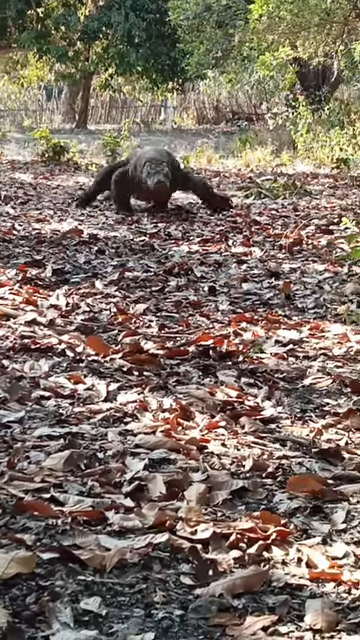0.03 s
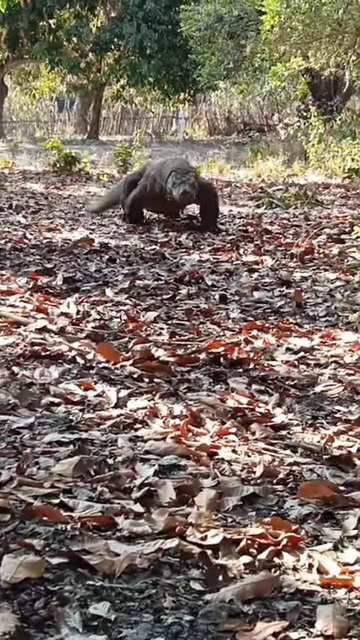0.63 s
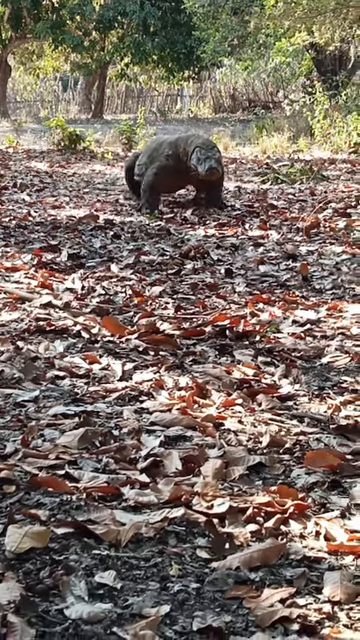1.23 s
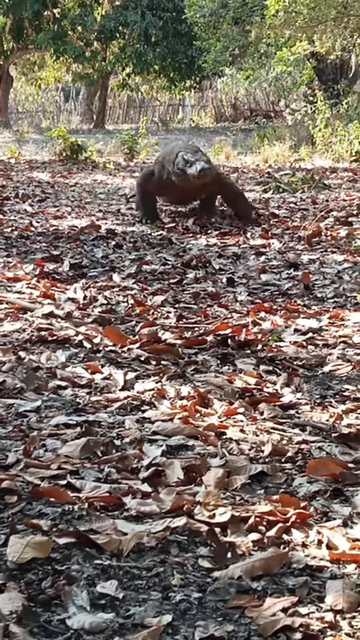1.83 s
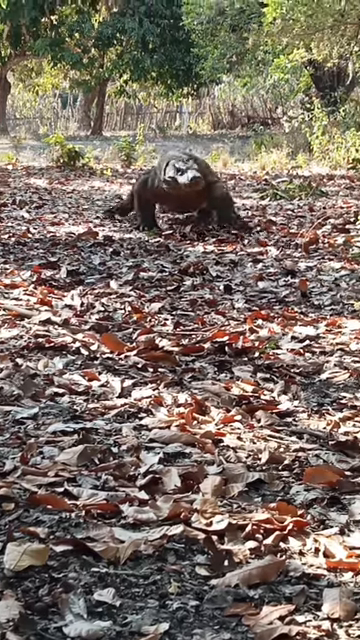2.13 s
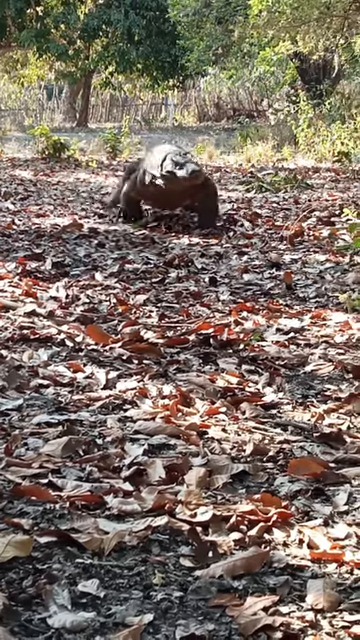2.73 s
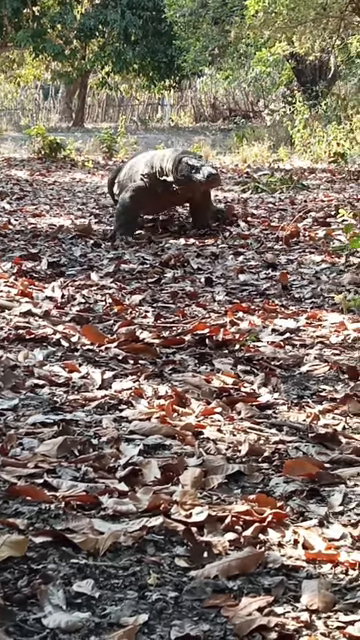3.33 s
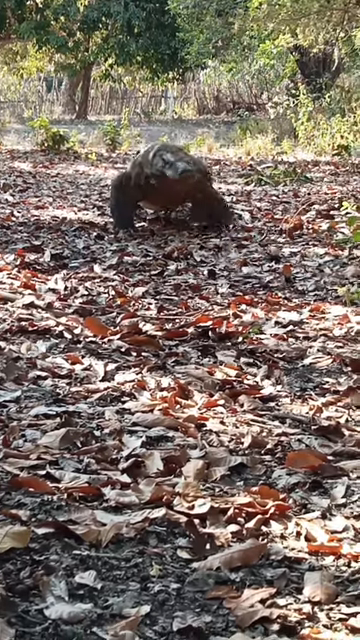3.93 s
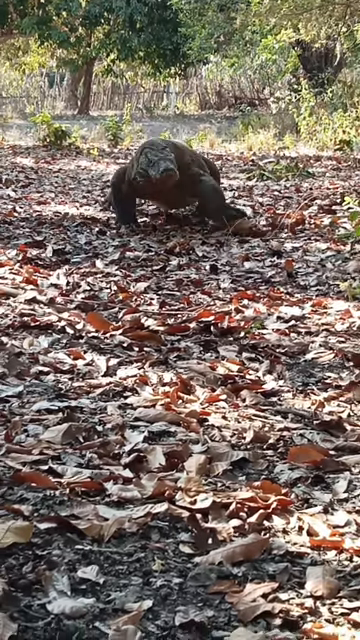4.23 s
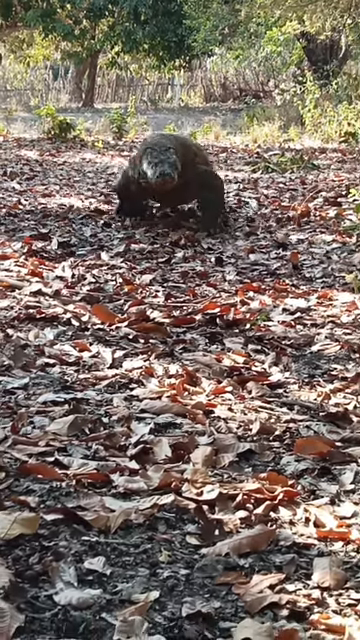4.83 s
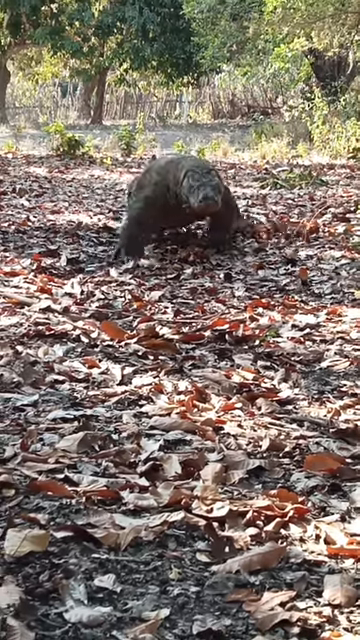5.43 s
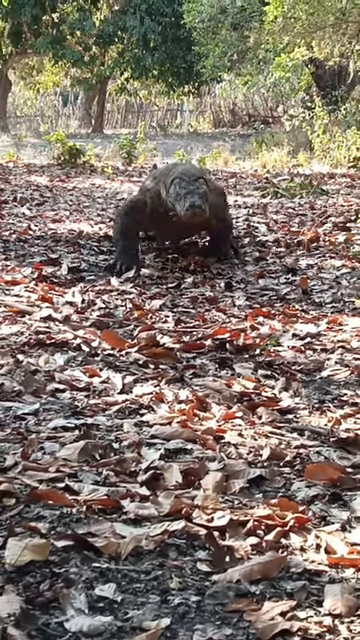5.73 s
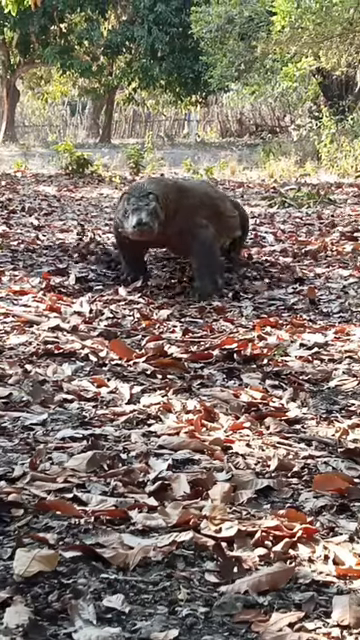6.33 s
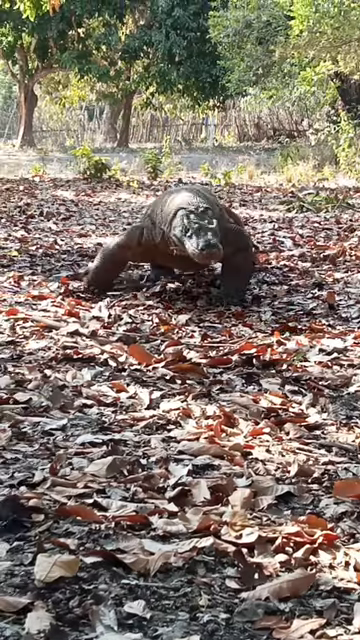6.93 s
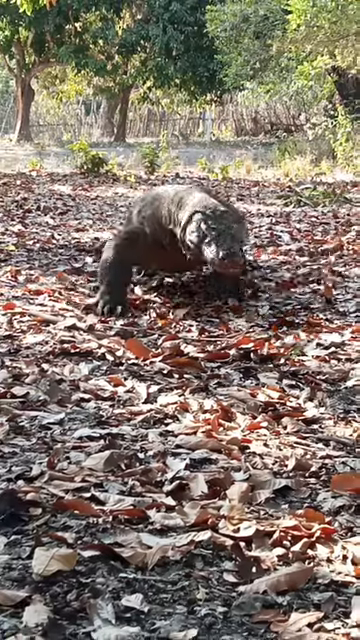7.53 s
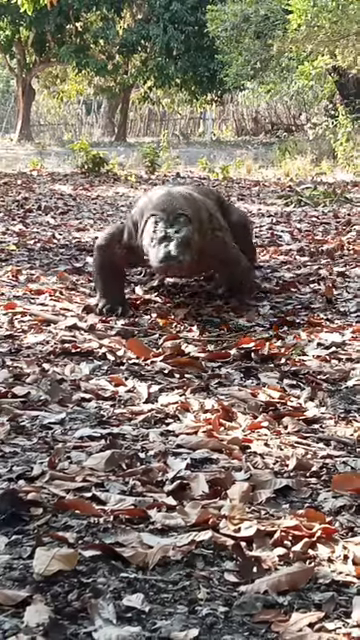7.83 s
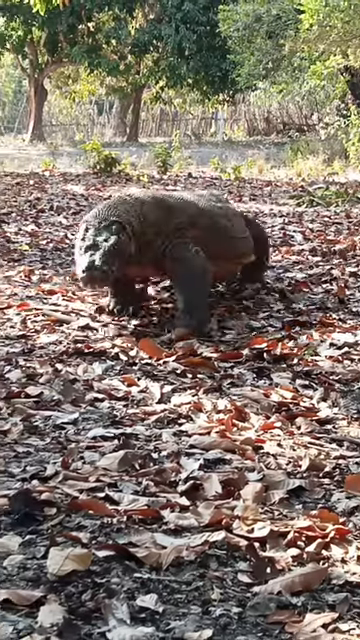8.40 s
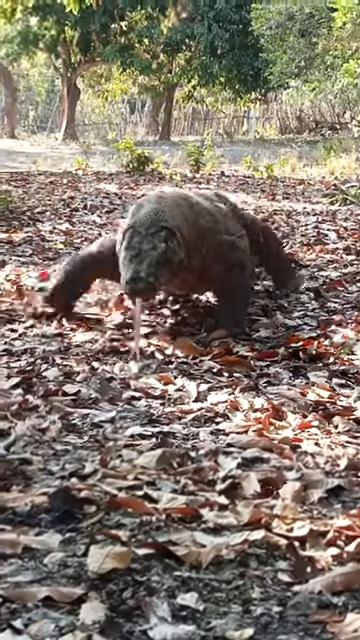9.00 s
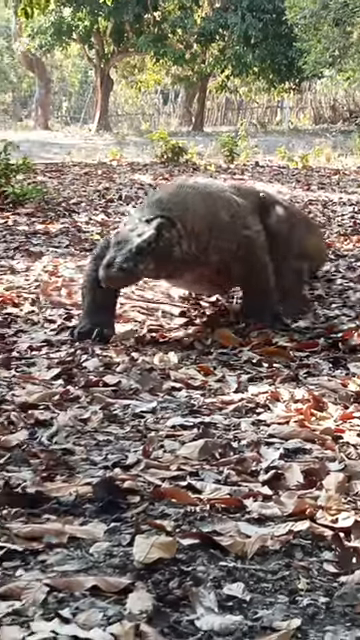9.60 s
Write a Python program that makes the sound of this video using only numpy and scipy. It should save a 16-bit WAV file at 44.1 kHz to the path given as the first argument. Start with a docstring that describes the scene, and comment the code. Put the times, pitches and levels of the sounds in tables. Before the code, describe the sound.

A heavy lizard walks through dry leaf litter outdoors toward a low microphone. Each stride crushes and drags leaves in a crackling swell, a little more than once a second, with lighter scuffs between. Twigs snap, leaf edges tick and soft thuds sound over a low rumble and faint air. Near the end there is a brief dull handling rub, and the crunching becomes closer and crisper.

```python
"""Crunching, rustling strides in dry leaf litter: a heavy lizard walks towards a low phone, outdoors.
Each stride crushes and drags leaves in a swell of tiny fractures, with lighter scuffs between.
Twigs snap, leaf edges tick, and soft thuds sound over a low rumble and faint air.
Near the end the animal is close and the phone turns, with a dull rub and a shift of treble colour. Mono."""
import sys
import numpy as np
from scipy import signal
from scipy.fft import rfft, irfft, next_fast_len
from scipy.io import wavfile
from scipy.ndimage import uniform_filter1d

SR = 44100
rng = np.random.default_rng(int(sys.argv[2]) if len(sys.argv) > 2 else 0)


def master(y):
    """Save y as 16-bit WAV."""
    cut = np.clip(np.atleast_2d(y).T, -1, 1)
    pcm = np.round(cut * 32767)  # scale
    wavfile.write(sys.argv[1], SR, pcm.astype(np.int16))


N = 426006
T = np.arange(N) / SR

# A foot presses and drags. Each row: full weight at seconds, level in dB, rise, hold and fall in seconds,
# then crisp treble, papery rasp, hollow body, fine sizzle and 3 kHz notch as tone offsets in dB.
STRIDES = [(0.365, -23.5, 0.28, 0.099, 0.42, -9.5, -5.5, -16, -17, -1),
           (1.094, -23, 0.11, 0.093, 0.17, -10.5, -4.5, -15.5, -17.5, -4),
           (1.73, -21, .126, 0.067, .25, -7, -4.5, -17.5, -21, -2.5),
           (2.475, -24.5, .19, 0.074, .23, -12.5, -2.5, -15, -17, -1),
           (3.11, -23, .075, 0.091, 0.24, -5.5, -2.5, -13.5, -19, -3),
           (3.838, -32, .28, 0.074, 0.28, -14, -5.1, -16.5, -18, -0.5),
           (4.641, -25.5, .2, 0.079, 0.49, -10, -6, -15.5, -18, 0.5),
           (5.441, -25, 0.061, 0.14, 0.14, -9.5, -5, -15, -21.5, -3),
           (6.259, -24, .21, .035, .33, -6.5, -3.5, -15.5, -18, -2),
           (6.8, -28, .07, .17, 0.29, -9.5, -4.5, -14, -18, 0.5),
           (7.696, -23, 0.27, 0.06, 0.44, -7.5, -3, -15.5, -18, -1),
           (8.56, -25.4, .05, .15, .4, -4, -1.6, -14, -20, -1),
           (9.438, -22.5, .06, .036, .075, -12.5, -4.5, -13.5, -15.5, -6)]
# Brittle leaves are spent and the foot sinks in: drift of those five offsets in dB per second.
DRIFT_DB_PER_S = (-22.5, -1, 2.5, 13, -10)
# A foot lifts or the tail sweeps. Each row: peak time in seconds, level in dB, rise and fall in seconds,
# crisp and rasp offsets in dB.
SCUFFS = [(.025, -27, .24, 0.092, -9.5, -7.5), (.188, -32, 0.31, 0.13, -12, -6.5),
          (.728, -28, 0.063, .07, -12, -6), (.82, -38.5, .14, 0.11, -30, 1),
          (1.38, -30.5, .16, 0.053, -5, -6.5), (1.541, -34.5, .11, 0.081, -6, -2),
          (1.935, -29, .15, 0.094, -14, -5.3), (2.092, -26, .11, 0.034, -12.5, -8.5),
          (2.738, -30.5, .12, 0.071, -9, -2), (2.965, -38, .17, 0.062, -4.5, -4),
          (3.375, -31.3, .14, .11, -10, -5), (3.58, -38, .11, .2, -17, -2),
          (4.116, -41, .13, 0.099, -6, -3.7), (4.216, -37, .18, 0.051, -10.5, -6.5),
          (4.501, -34, 0.21, .08, -13, -3.5), (5.003, -28, 0.087, .09, -13, -6.5),
          (5.255, -41, 0.26, 0.039, -6, -8), (5.797, -33.5, 0.19, 0.058, -9.5, -3),
          (5.874, -40, .07, .09, -7, -3.5), (6.133, -31.5, 0.29, 0.091, -6, -2),
          (6.537, -29.5, .11, 0.092, -9.5, -6.5), (6.65, -39.5, 0.16, 0.19, -11.5, -5),
          (7.19, -35.5, .12, .1, -9, 4.5), (7.291, -31, .1, 0.054, -12, -6),
          (7.947, -34, 0.25, 0.11, -46.5, -12), (8.186, -28, .15, .07, -20.5, -8.5),
          (8.98, -32, 0.29, 0.065, -10, -2), (9.1, -36, .08, 0.093, -12, -9),
          (9.608, -38.5, 0.086, 0.077, -7, -1)]
# Body, sizzle and notch offsets in dB, for scuffs and tail.
SCUFF_TONE_DB = (-15, -16, 0)
# Echoes off the ground and the animal's flank. Each row: mean delay in milliseconds, rms gain.
ECHOES = [(.3, .07), (.62, .09), (1.1, .12)]
# Twigs and stalks snap. Each row: start in seconds, relative level in dB, pitch in Hz.
SNAPS = [(.7396, -17.5, 1512), (1.0391, -16, 1950), (1.4038, -14, 1700), (1.423, -21, 1900),
         (2.0947, -14, 1480), (2.1088, -13, 1300), (2.5364, -12, 1199), (2.9156, -20, 1900),
         (2.9508, -19.5, 1110), (3.4956, -20, 1080), (4.2837, -24.5, 1370), (4.935, -13.5, 1310),
         (4.9659, -10.5, 1210), (5.0136, -13, 1250), (5.024, -11, 762), (5.052, .5, 1040),
         (5.1905, -26, 1320), (5.3267, -25, 1210), (5.8836, -24, 1490), (6.6813, -17.5, 1180),
         (8.2054, -19, 1300), (9.071, -21, 560), (9.08, -20, 1560), (9.1194, -17, 1500), (9.136, -18, 1130),
         (9.1789, -20, 1850), (9.5907, -19, 2130), (9.6307, -16, 2080)]
# Twig resonances. Each row: multiple of the pitch, relative level in dB, 60 dB decay in seconds.
TWIG_MODES = [(1, 16.5, 0.0037), (1.75, 6.5, 0.0034), (3.9, 0, 0.0065)]
# Leaf edges split. Each row: start in seconds, relative level in dB.
TICKS = [(.9534, -20), (1.3763, -17), (5.248, -18), (5.2767, -16), (7.1975, -19.5), (8.4224, -26),
         (9.0804, -9), (9.1022, -18), (9.1354, -21), (9.2154, -26), (9.3417, -22), (9.3605, -30),
         (9.5192, -13), (9.5904, -14.5), (9.6086, -16)]
# Soft thuds. Each row: centre in seconds, relative level in dB, pitch in Hz.
THUDS = [(.779, -35, 127.6), (0.856, -33, 104), (0.955, -39, 94), (1.116, -32, 110), (1.271, -38, 89),
         (1.89, -39.5, 106), (2.11, -32, 86.44), (2.315, -44, 80.8), (3.17, -46.5, 120.1), (3.784, -38, 89),
         (4.277, -42, 83.2), (5.053, -40, 75), (7.451, -33, 94.99), (7.548, -32, 99.5), (7.764, -29.5, 119),
         (8.37, -34, 93.05), (8.775, -30.5, 159.8), (8.863, -28, 92), (9.111, -36, 141)]
# Low rumble at the phone. Each row: centre in seconds, level in dB, half width in seconds.
RUMBLE_SWELLS = [(.08, -60, 0.087), (1.051, -54, .17), (2.12, -61, 0.25), (4.55, -53, .1),
                 (7.38, -45, 0.077), (7.76, -44.5, 0.16), (8.37, -48.5, 0.069), (8.87, -48, 0.063)]
# Spectra of far leaves, near leaves, ticks, rumble and air. Each row: frequency in Hz, gain in dB.
FAR_LEAF_COLOUR = [(100, -22.5), (250, -10.5), (600, -3), (950, 1.8), (1600, 0), (2500, -1), (3050, -6),
                   (3850, 3), (4450, 2), (5100, -7.5), (6100, -7), (7300, -12), (8600, -5.5),
                   (11300, -22.5), (15500, -27.5)]
NEAR_LEAF_COLOUR = [(100, -18), (250, -8.5), (600, 0), (1600, 2), (3100, 2), (4000, 3.5), (5500, -7),
                    (7700, -16), (9700, -4), (10700, -8.5), (11800, -19), (13500, -21), (15000, -21.5)]
TICK_COLOUR = [(500, -28), (2000, -5), (4200, 11), (7000, -14), (9500, 10.5), (12000, -13), (15000, -7)]
RUMBLE_COLOUR = [(25, -28), (50, -9), (78, 2.5), (115, -4), (180, -6.5), (500, -40)]
AIR_COLOUR = [(20, -54), (80, 6), (300, 6), (1000, -15), (4000, 7.5), (8000, -32), (15000, -15.5)]


def leaves(turn_start_s=8.765, turn_end_s=8.89):
    """Harder crushing breaks more leaves a second; each contact's tone weights the bands of the rustle."""
    crush_db, push_db, crisp_db, rasp_db, body_db, sizzle_db, notch_depth_db, swish_hz = gait()
    near = np.clip((T - turn_start_s) / (turn_end_s - turn_start_s), 0, 1)
    cracks_per_s = 5500 * undb(.75 * (crush_db + 28) - 7 * near)  # close by, single cracks stand out
    grains = reflect(crackle(cracks_per_s))
    rustle = swish(grains, swish_hz) * (1 - near) + colour(grains, NEAR_LEAF_COLOUR) * near
    # A dragged foot sounds hollow: rasp and body stand out, a notch opens between them.
    hollow_db = .5 * (rasp_db + 3.5) + .45 * (body_db + 13)
    knock_db = push_db - 5.5 + .35 * (body_db + 13.5) - .08 * (rasp_db + 5.5)
    crunch_db = -5.5 - hollow_db
    notch_db = notch_depth_db - 10.5 - .74 * hollow_db
    hiss_db = .36 * rasp_db + .38 * crisp_db + .32 * sizzle_db + 2.2 * near - .8
    bands = split(rustle, edges_hz=(600, 1400, 2750, 3350, 5000, 7500, 11300))
    bands_db = body_db + push_db - .6, knock_db, crunch_db, notch_db, rasp_db, hiss_db, crisp_db, sizzle_db
    rustle = sum(unit(part) * undb(db) for part, db in zip(bands, bands_db))
    return rustle * undb(crush_db + slips() - 1)


def gait(tail_db=-48, load_db=2, stride_hz=8610, glide_hz=417, glide_s=.15, scuff_hz=8770):
    """Tail, strides and scuffs add in power. Returns level, push-off, five tones (dB) and swish (Hz)."""
    t = T[::50]
    total_power = np.full(len(t), undb(tail_db) ** 2)
    tone_sum = np.outer([-10.5, -4, *SCUFF_TONE_DB, scuff_hz], total_power)  # tail: crisp, rasp first
    push_db = 0
    for at_s, db, rise_s, hold_s, fall_s, *tone_db in STRIDES:
        since_s = t - at_s
        load = np.clip(since_s / hold_s, 0, 1) - .5  # weight comes onto the foot
        power = swell(since_s, db, rise_s, hold_s, fall_s) * undb(load_db * load) ** 2
        drift_db = np.outer(DRIFT_DB_PER_S, np.clip(since_s, -.1, .23))
        tone_sum[:-1] += power * (np.array(tone_db)[:, None] + drift_db)
        tone_sum[-1] += power * (stride_hz + glide_hz * np.clip(since_s / glide_s, -1, 1))
        push_db += 1 / (1 + ((since_s - .27 * hold_s) / .058) ** 2)  # push-off deepens the crunch
        total_power += power
    for at_s, db, rise_s, fall_s, crisp_db, rasp_db in SCUFFS:
        power = swell(t - at_s, db, rise_s, hold_s=.02, fall_s=fall_s)
        tone_sum += np.outer([crisp_db, rasp_db, *SCUFF_TONE_DB, scuff_hz], power)
        total_power += power
    controls = 10 * np.log10(total_power), push_db, *(tone_sum / total_power)
    return [np.interp(T, t, control) for control in controls]


def swell(since_s, db, rise_s, hold_s, fall_s, shoulder_db=1.04):
    """Power of one contact: 20 dB up in rise_s, hold, 20 dB down in fall_s, with round shoulders."""
    away = np.maximum(-since_s / rise_s, (since_s - hold_s) / fall_s)
    drop_db = np.hypot(20 * np.clip(away, 0, 10), shoulder_db) - shoulder_db
    return undb(db - drop_db) ** 2


def crackle(rate_per_s, ring_db=1.5, flicker_db=2.5, scatter_db=-9, scatter_t60_s=.019):
    """Sharp cracks plus the ringing of leaves of many sizes, which come and go as the foot moves on."""
    cracks = fractures(rate_per_s, spread_db=2)
    edges_hz = np.linspace(np.sqrt(300), np.sqrt(16000), 27) ** 2
    rings = 0
    for lo_hz, hi_hz in zip(edges_hz, edges_hz[1:]):
        ring = band(fractures(rate_per_s / 3.5, spread_db=4), lo_hz, hi_hz)
        rings += ring * undb(flicker_db * wander(rate_hz=30))
    direct = unit(cracks + undb(ring_db) * unit(rings))
    # Each crack briefly shakes the neighbouring leaves.
    shaken_power = signal.lfilter([1], [1, -undb(-120 / (scatter_t60_s * SR))], direct ** 2)
    scatter = unit(np.sqrt(shaken_power) * rng.standard_normal(N))
    return unit(direct + undb(scatter_db) * scatter)


def fractures(rate_per_s, spread_db):
    """Random clicks of uneven size; power is independent of rate."""
    at = np.flatnonzero(rng.random(N) * SR < rate_per_s)
    sizes = undb(spread_db * np.clip(rng.standard_normal(len(at)), -3, 3))
    clicks = np.zeros(N)
    clicks[at] = sizes * rng.choice([-1, 1], len(at)) / np.sqrt(rate_per_s[at])
    return unit(clicks)


def swish(grains, centre_hz):
    """Feet move against the ground, so the treble humps of the leaf colour glide."""
    stops_hz = np.linspace(8100, 9600, 6)
    hz, db = np.transpose(FAR_LEAF_COLOUR)
    out = 0
    for stop_hz, share in zip(stops_hz, np.eye(len(stops_hz))):
        moved_hz = hz * (stop_hz / 8700) ** np.minimum(hz / 8000, 1.2)  # low resonances barely move
        crossfade = np.interp(centre_hz, stops_hz, share)
        out += colour(grains, np.column_stack([moved_hz, db])) * crossfade
    return out


def slips(rate_per_s=44, decay_s=.011, depth_db=.79):
    """Level offsets in dB: a foot breaks free at once, then settles."""
    jolts = signal.lfilter([1], [1, -np.exp(-1 / (decay_s * SR))], rng.random(N) < rate_per_s / SR)
    return depth_db * unit(jolts - jolts.mean())


def reflect(x, wander_share=.2, wander_hz=6):
    """Short echoes wander as the animal moves, giving each drag its own phasey colour."""
    out = x
    for delay_ms, gain in ECHOES:
        lag_s = delay_ms / 1000 * (1 + wander_share * wander(wander_hz))
        out = out + gain * wander(wander_hz) * np.interp(T - lag_s, T, x)
    return unit(out)


def snaps(gain_db=-1, rise_s=.00021, splinter_db=-22, splinter_t60_s=.007):
    """A twig gives way: a pop of a few cycles with a faint splintering tick."""
    out, t = np.zeros(N), T[:SR // 50]
    for start_s, db, hz in SNAPS:
        modes = sum(undb(mode_db - 60 * t / t60_s) * np.sin(2 * np.pi * hz * ratio * t)
                    for ratio, mode_db, t60_s in TWIG_MODES)
        pop = band(modes * (1 - np.exp(-t / rise_s)), lo_hz=420, hi_hz=5400)
        splinter = undb(splinter_db - 60 * t / splinter_t60_s) * rng.standard_normal(len(t))
        add(out, start_s, undb(db + gain_db) * (pop / np.abs(pop).max() + splinter))
    return out


def ticks(gain_db=-5, t60_s=.0094):
    """A dry leaf edge splits in a short, bright burst."""
    out, t = np.zeros(N), T[:SR // 50]
    for start_s, db in TICKS:
        burst = colour(rng.standard_normal(len(t)) * undb(-60 * t / t60_s), TICK_COLOUR)
        add(out, start_s, undb(db + gain_db) * burst / np.abs(burst).max())
    return out


def leaf_pops(level_db=-57, rate_per_s=25):
    """Bent leaves spring back with faint, dull pops, heard mostly between strides."""
    clicks = fractures(np.full(N, rate_per_s), spread_db=6.5)
    return undb(level_db) * unit(band(clicks, lo_hz=1200, hi_hz=2600))


def thuds(gain_db=-2.5, width_s=.0042):
    """Soft pushes of two or three slow cycles."""
    out, t = np.zeros(N), T[:SR // 5] - .1
    for centre_s, db, hz in THUDS:
        push = np.sin(2 * np.pi * hz * t) / np.cosh(t / width_s)
        add(out, centre_s + t[0], undb(db + gain_db) * push)
    return out


def handling(level_db=-40, centre_s=8.82, width_s=.04):
    """The hand rubs briefly on the turning phone."""
    envelope = np.exp(-.5 * ((T - centre_s) / width_s) ** 2)
    rub = unit(band(rng.standard_normal(N), lo_hz=140.1, hi_hz=518))
    return undb(level_db) * envelope * rub


def rumble(floor_db=-74.5, shudder_db=-21.5, shudder_s=.035):
    """Low noise comes and goes, with a shudder around each thud."""
    shudder, t = np.zeros(N), T[:SR // 5] - .1
    for centre_s, db, _ in THUDS:
        add(shudder, centre_s + t[0], undb(db + shudder_db) / np.cosh(t / shudder_s))
    envelope = undb(floor_db)
    for centre_s, db, half_width_s in RUMBLE_SWELLS:
        envelope = np.hypot(envelope, undb(db) / (1 + ((T - centre_s) / half_width_s) ** 2))
    return np.hypot(envelope, shudder) * unit(colour(rng.standard_normal(N), RUMBLE_COLOUR))


def air(level_db=-52.5):
    """Faint, steady outdoor background."""
    return undb(level_db) * unit(colour(rng.standard_normal(N), AIR_COLOUR))


def undb(db):
    """Decibels to gain."""
    return np.exp(np.asarray(db) * (np.log(10) / 20))


def unit(x):
    """Scale to rms 1."""
    return x / np.sqrt(np.mean(x ** 2))


def add(out, start_s, sound):
    """Mix in a short sound."""
    i = int(start_s * SR)
    out[i:i + len(sound)] += sound[:N - i]


def band(x, lo_hz, hi_hz):
    """Causal band-pass."""
    return signal.sosfilt(signal.butter(2, [lo_hz, hi_hz], "band", fs=SR, output="sos"), x)


def colour(x, points, size=4096):
    """Minimum-phase filter through (Hz, dB) points."""
    hz, db = np.transpose(points)
    bins_hz = np.maximum(np.arange(size // 2 + 1) * SR / size, 1)
    gain = undb(np.interp(np.log(bins_hz), np.log(hz), db))
    cepstrum = irfft(np.log(gain))
    cepstrum[1:size // 2] *= 2
    cepstrum[size // 2 + 1:] = 0
    return signal.oaconvolve(x, irfft(np.exp(rfft(cepstrum))))[:len(x)]


def split(x, edges_hz, order=30):
    """Adjoining bands that add up to x."""
    size = next_fast_len(N)
    spectrum = rfft(x, size)
    bins_hz = np.arange(size // 2 + 1) * SR / size
    lowpasses = [0] + [1 / (1 + (bins_hz / hz) ** order) for hz in edges_hz] + [1]
    return [irfft(spectrum * (hi - lo), size)[:N] for lo, hi in zip(lowpasses, lowpasses[1:])]


def wander(rate_hz):
    """Slow random drift, rms 1."""
    hold = int(SR / rate_hz)
    steps = np.repeat(rng.standard_normal(N // hold + 1), hold)
    return unit(uniform_filter1d(steps, hold)[:N])


def scene():
    """All sources reach one microphone."""
    litter = snaps() + leaves() + leaf_pops() + ticks()
    lows = thuds() + rumble() + handling()
    mono = litter + lows + air()
    return np.array([mono, mono])


def record(dry):
    """The phone clips at full scale and cuts the top."""
    lowpass = signal.ellip(10, .2, 80, 15700, fs=SR, output="sos")
    return signal.sosfilt(lowpass, np.clip(dry, -1, 1))


dry = scene()
out = record(dry)
master(out)
```